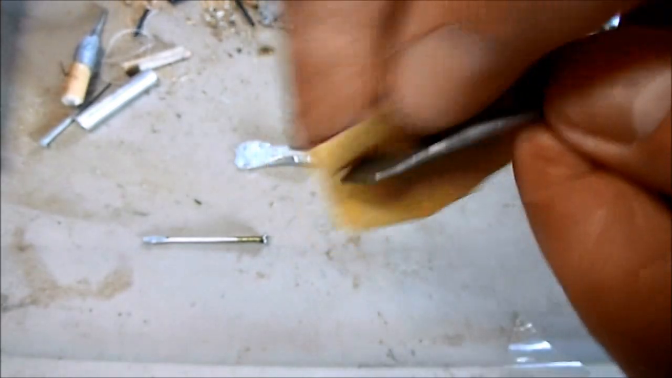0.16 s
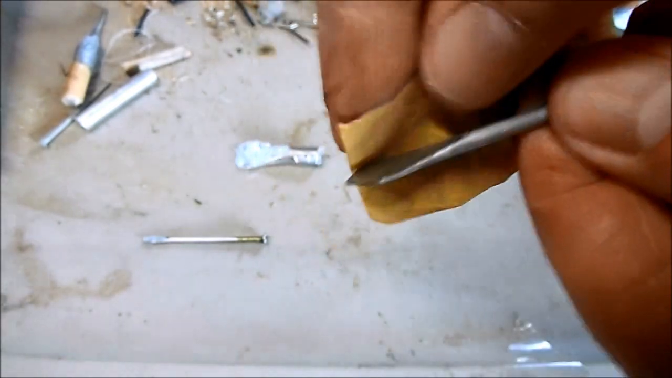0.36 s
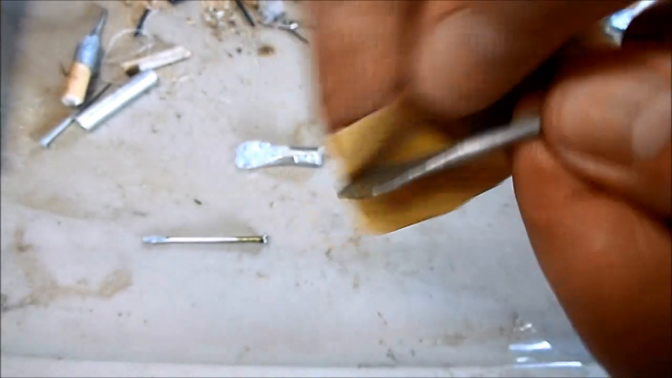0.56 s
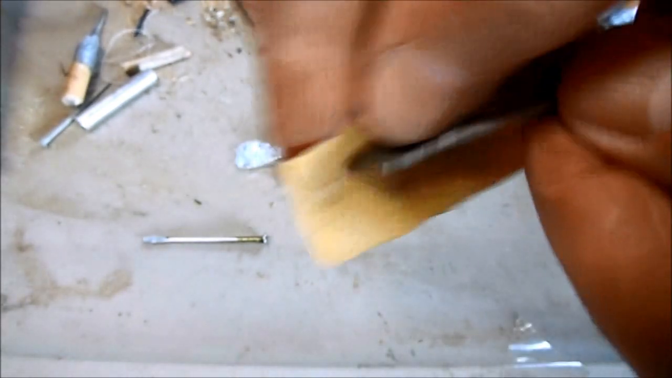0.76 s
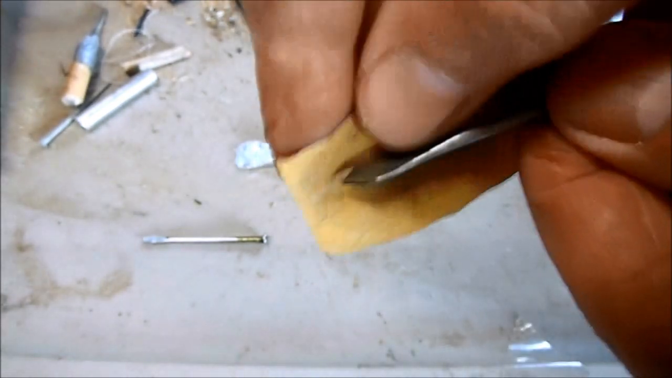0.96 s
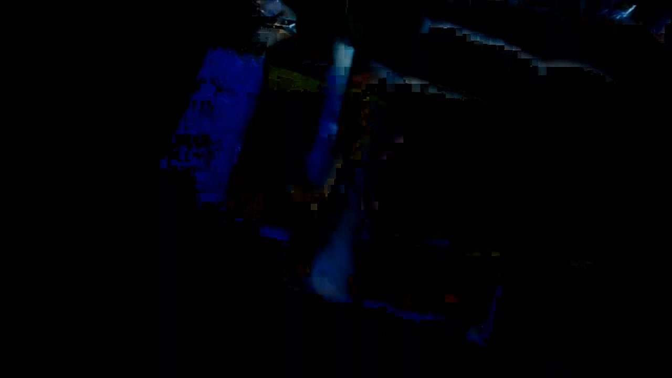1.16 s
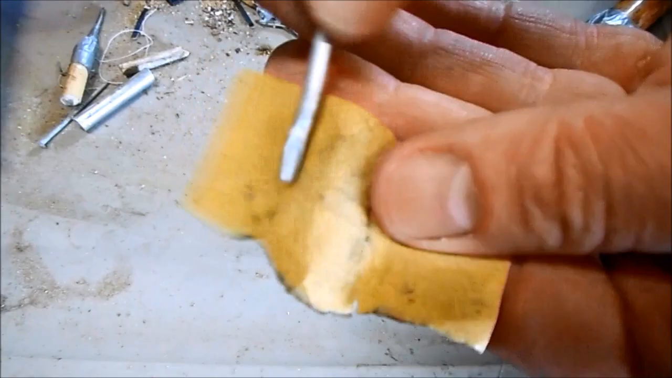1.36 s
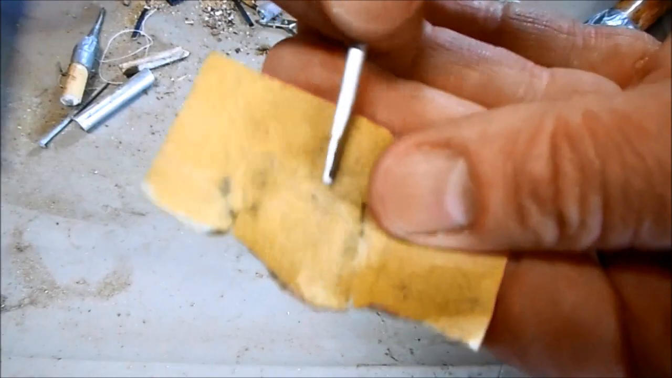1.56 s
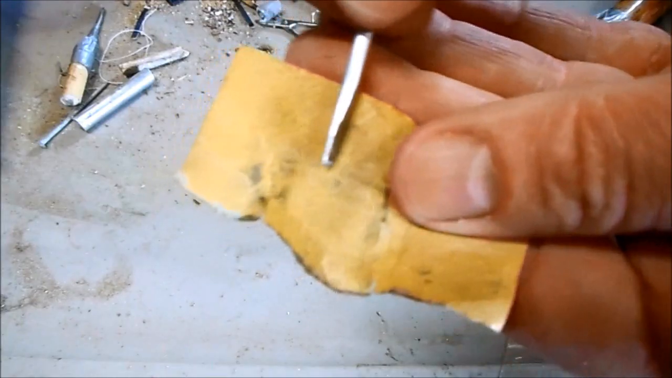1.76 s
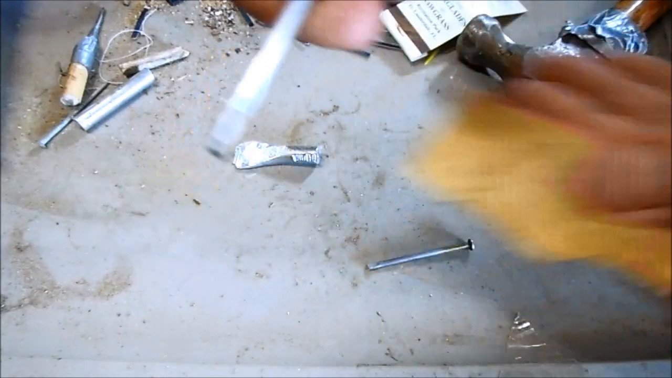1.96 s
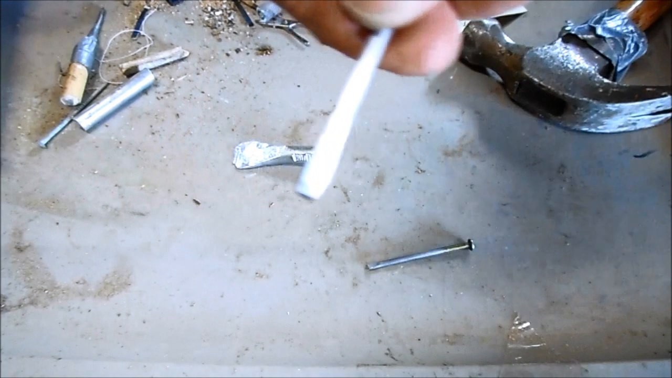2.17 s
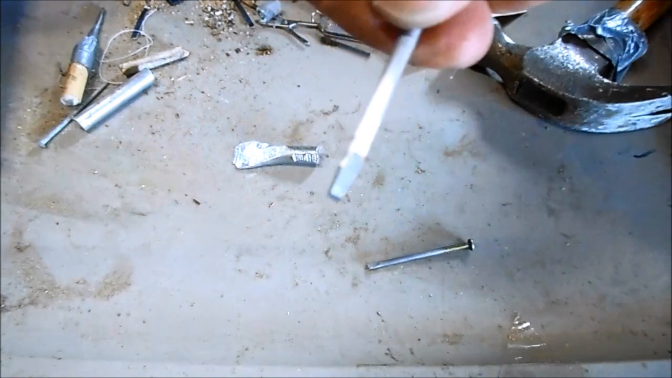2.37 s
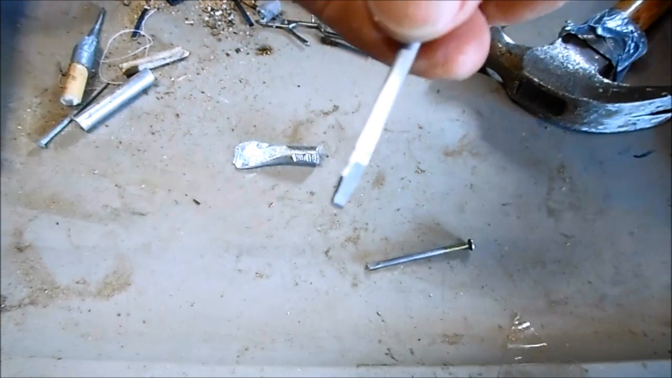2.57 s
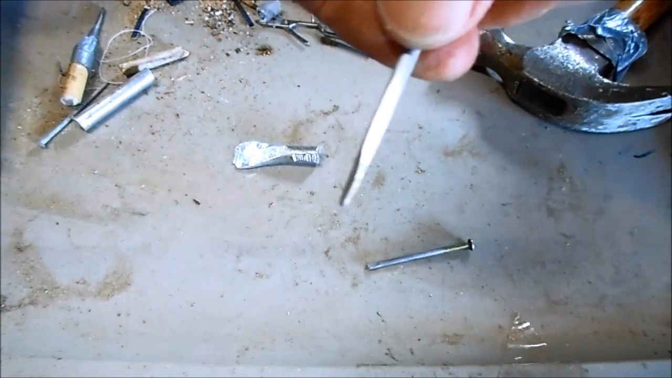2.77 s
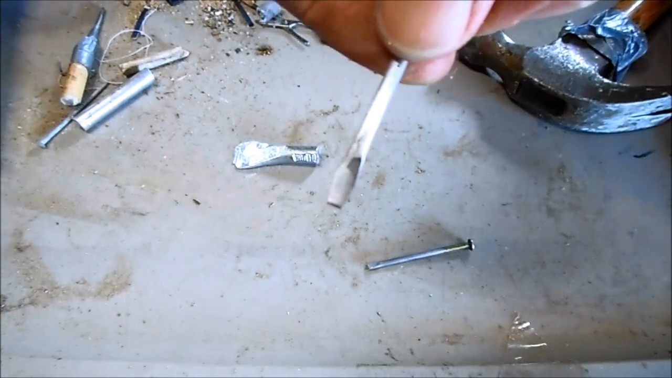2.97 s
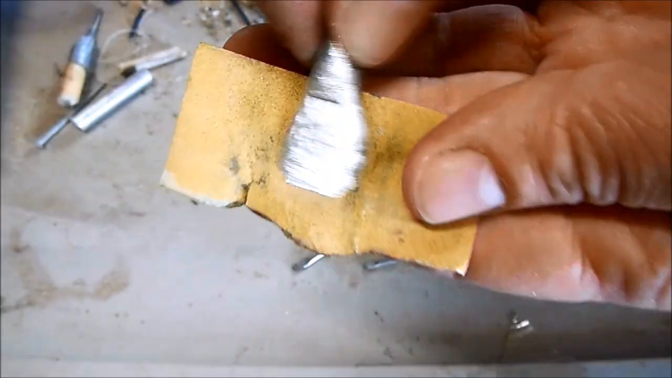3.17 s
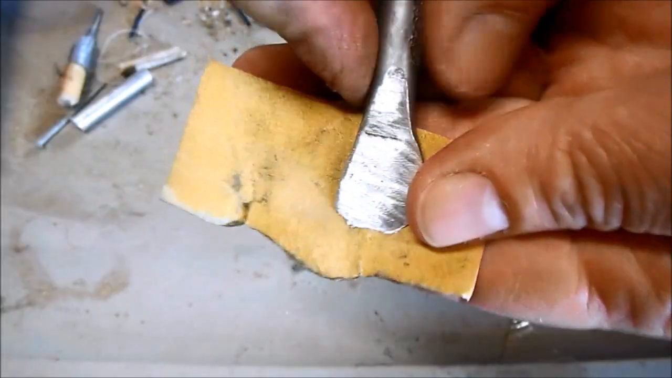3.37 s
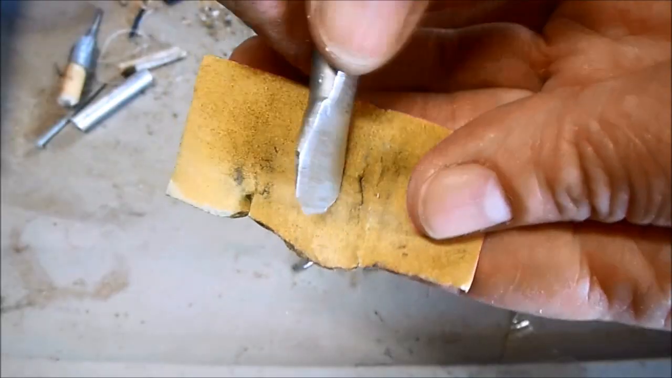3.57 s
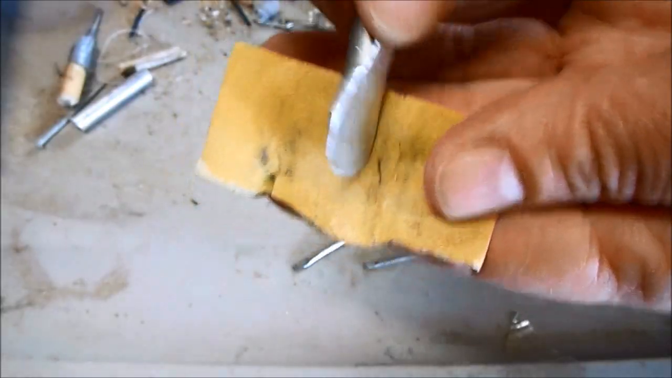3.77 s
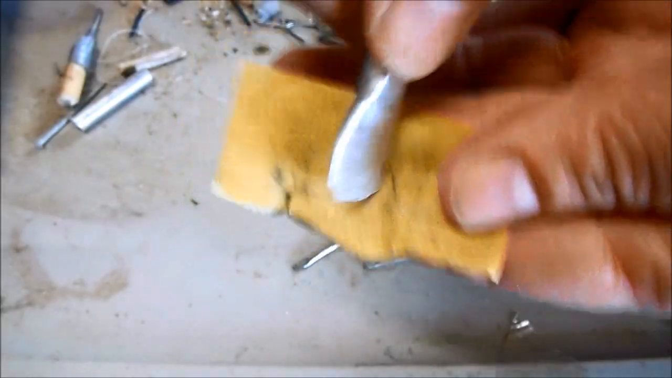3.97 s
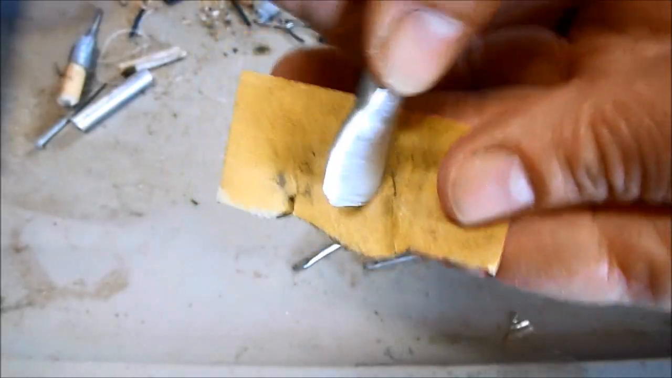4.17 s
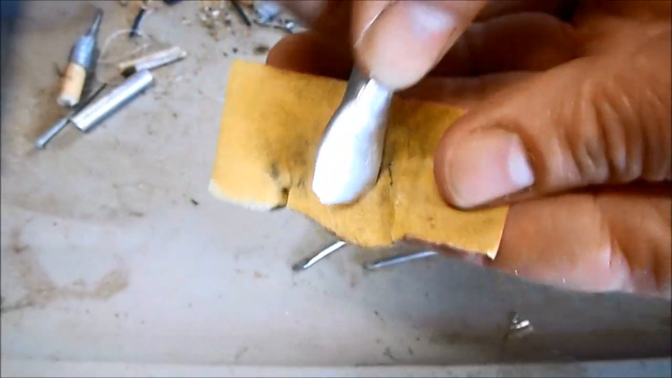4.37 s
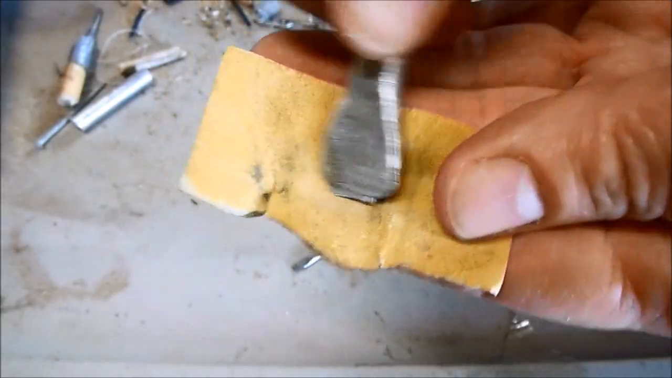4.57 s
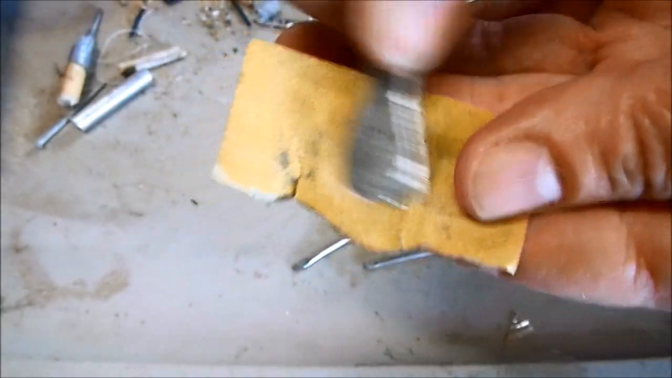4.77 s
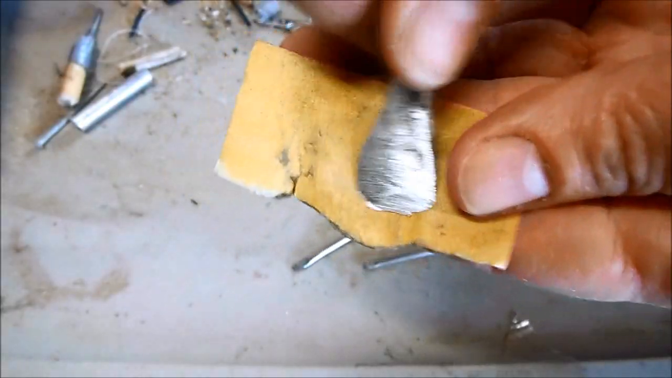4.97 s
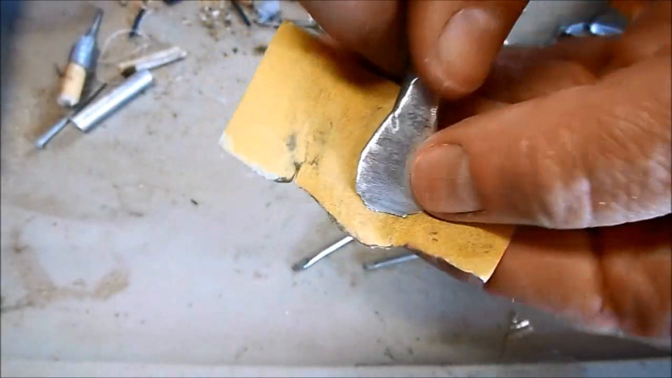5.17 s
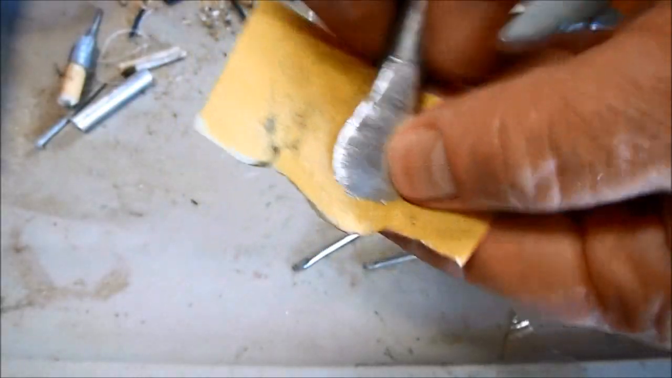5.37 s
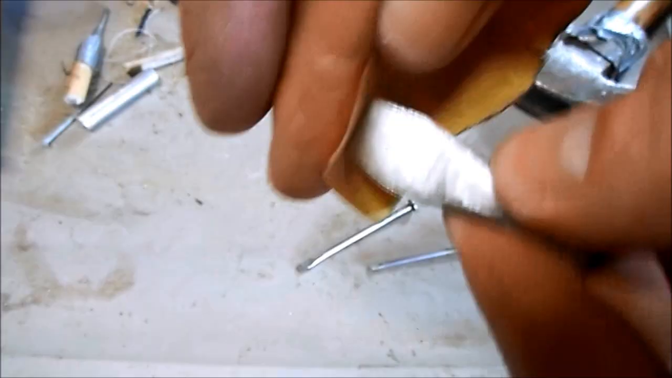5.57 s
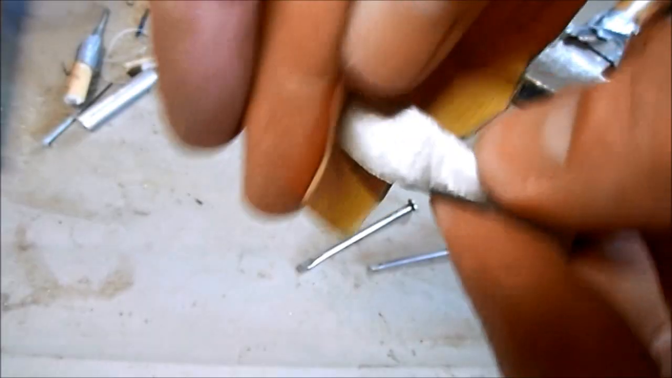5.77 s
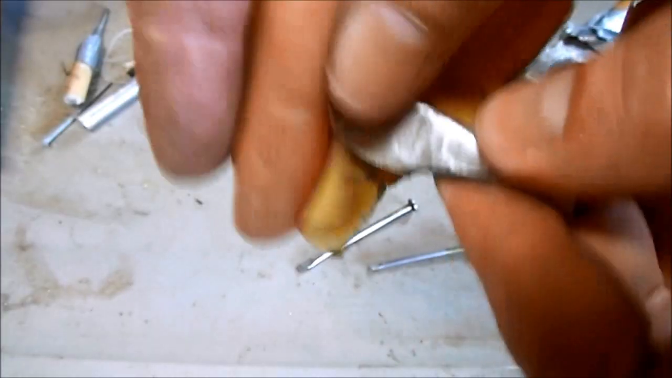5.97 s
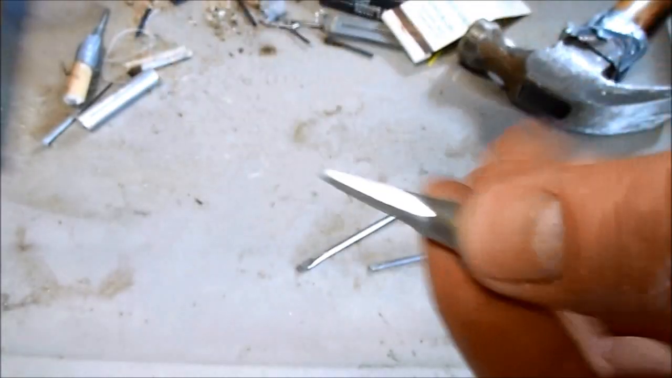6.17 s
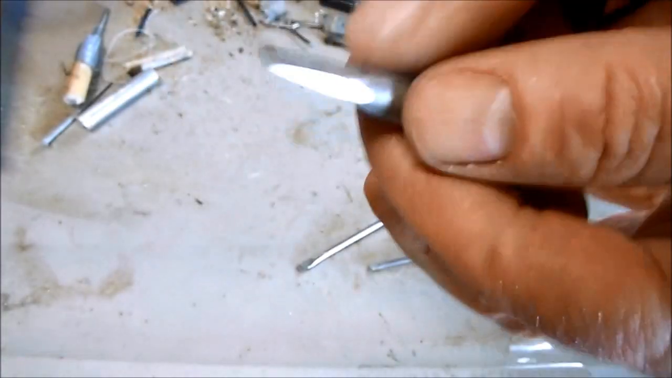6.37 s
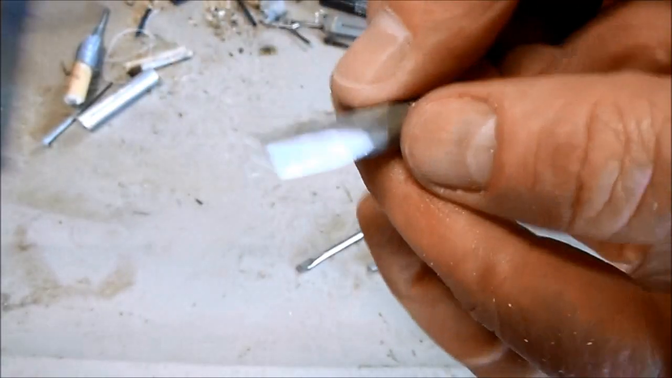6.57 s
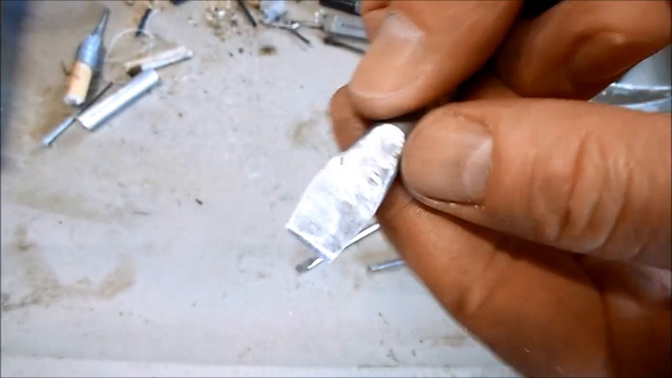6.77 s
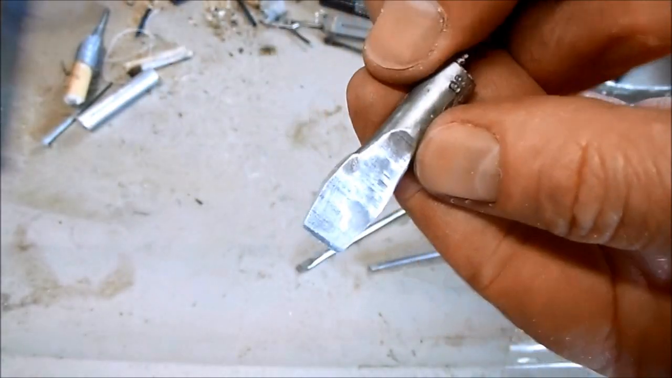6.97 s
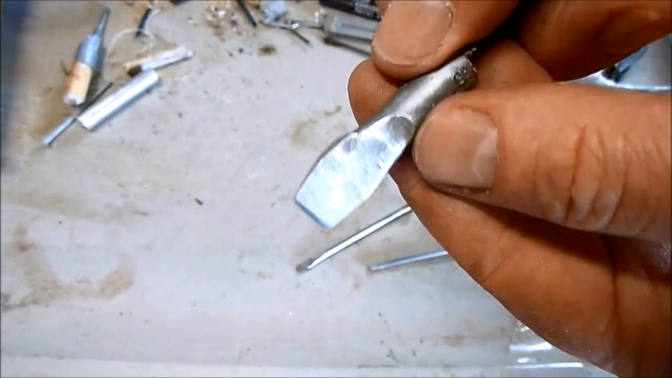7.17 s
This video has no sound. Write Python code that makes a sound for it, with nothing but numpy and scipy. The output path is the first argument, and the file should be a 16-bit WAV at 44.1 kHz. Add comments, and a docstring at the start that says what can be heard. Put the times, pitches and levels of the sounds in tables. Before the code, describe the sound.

Close and dry, at a workbench in a quiet room. From 0 to 1.25 seconds a steel blade rubs sandpaper in an even, fast back-and-forth rasp, about four full cycles a second, each push slightly stronger than the pull, over a low steady hum and soft rumble. The hum cuts off at about 1.2 seconds. Weaker, separate scratches follow until 1.9, then mostly faint room noise until 3.1. Two firm scrapes at 3.2 open a second, looser burst: after a weaker patch, single strokes come roughly every tenth of a second from 4 to 5, brightest and sharpest around 4.5 and 4.9, with crisp grit cracks. Scattered rough strokes continue from 5.5 to 6.4 as low handling rumble returns, including a hard bright scrape at 6.1. At 6.8 a light scrape and dull little bump leave a very faint steel ring, fading into rumble by 7.2.

```python
"""A low hum and a soft rumble lie under an even back-and-forth rasp, over faint room noise and sliding skin.
A steel screwdriver blade is rubbed on sandpaper held in the fingers, close to the microphone.
Looser single strokes follow as the hum stops: filtered bursts of grain noise that swell with the hand's speed.
Each bites as it starts, grit snags on the edge in short cracks, and each new grip colours the rasp.
Near the end the rumble returns and the blade bumps a finger: a dull tone with a faint steel ring."""
import sys
import numpy as np
from scipy import signal
from scipy.fft import rfft, irfft, next_fast_len
from scipy.io import wavfile
from scipy.ndimage import uniform_filter1d

SR = 44100
rng = np.random.default_rng(int(sys.argv[2]) if len(sys.argv) > 2 else 0)


def to_wav(s):
    """Save 16-bit WAV."""
    ch = np.atleast_2d(s).T  # columns
    pcm = np.round(np.clip(ch, -1, 1) * 32767)  # PCM
    wavfile.write(sys.argv[1], SR, pcm.astype(np.int16))


N = 319147  # length [samples]

# left-right likeness of the diffuse background: (frequency [Hz], likeness [0-1])
ROOM_LIKENESS = [(40, 0.93), (160, 0.96), (320, 0.67), (700, 0.65), (1500, 0.39), (3000, 0.11),
                 (6000, 0.09), (13000, 0.15)]


def from_db(db):
    """Amplitude factor of a level in dB."""
    return 10 ** (np.asarray(db) / 20)


def rms_one(x):
    """Scale to an rms of 1."""
    return x / np.sqrt(np.mean(x ** 2) + 1e-20)


def at_hz(points, hz):
    """A curve's value at the given frequencies, interpolated over log frequency."""
    f, value = np.transpose(points)
    return np.interp(np.log(np.maximum(hz, 1)), np.log(f), value)


def bell(hz, centre_hz, width_hz):
    """Shape of a resonance, 1 at its top; the width is taken at half height."""
    return 1 / (1 + (2 * (hz - centre_hz) / width_hz) ** 2)


def colour(x, gain_db, size=1024):
    """Causal (minimum-phase) filter with the shape gain_db(Hz), scaled to unit power gain."""
    gain = rms_one(from_db(gain_db(np.fft.rfftfreq(size, 1 / SR))))
    # folding the cepstrum onto positive times gives the minimum phase
    cepstrum = irfft(np.log(gain))
    cepstrum[1:size // 2] *= 2
    cepstrum[size // 2 + 1:] = 0
    impulse = irfft(np.exp(rfft(cepstrum)))
    return signal.fftconvolve(x, impulse[None], axes=1)


def noise(count, spectrum=None, likeness=None):
    """Stereo noise of rms 1, its left-right likeness set by frequency (close sounds by default)."""
    # left-right likeness of the close sounds: (frequency [Hz], likeness [0-1])
    close_likeness = [(500, 0.97), (2500, 1), (5000, 0.99), (9000, 0.81), (14000, 0.38)]
    size = next_fast_len(count)
    hz = np.fft.rfftfreq(size, 1 / SR)
    alike = np.clip(at_hz(close_likeness if likeness is None else likeness, hz), 0, 1)
    mid, side = rfft(rng.standard_normal((2, size)))
    both = np.sqrt(1 + alike) * mid + np.sqrt(1 - alike) * side * [[1], [-1]]
    if spectrum is not None:
        both = both * from_db(at_hz(spectrum, hz)) * (hz > 15)
    return rms_one(irfft(both, size)[:, :count])


def wobble(count, per_s):
    """Smooth random drift of spread 1 with per_s new values a second."""
    steps = np.arange(count) * per_s / SR
    # straight lines between the values shrink the spread; the factor restores it
    return np.interp(steps, np.arange(count), rng.standard_normal(count)) * np.sqrt(3 / 2)


def add(out, x, s):
    """Mix x in from time s [s]."""
    i = max(round(s * SR), 0)
    out[:, i:i + x.shape[1]] += x[:, :N - i]


def spells(rows, attack_s, release_s, sag_db_per_s=0):
    """Gain of a sound that comes in spells: each swells, holds or sags, and dies away."""
    t = np.arange(N) / SR
    gain = np.zeros(N)
    for start, end, db in rows:
        swell = np.clip((t - start) / attack_s, 0, 1)
        dying = np.exp(-np.maximum(t - end, 0) / release_s)
        gain += from_db(db - sag_db_per_s * (t - start)) * swell * dying
    return gain


def top_cut(x):
    """Steep low-pass at the top of the band."""
    return signal.sosfilt(signal.ellip(10, .3, 70, 14200, fs=SR, output="sos"), x)


def room():
    """Steady room noise from all around, weighted to the bass."""
    # spectrum of the room noise: (frequency [Hz], relative level [dB per Hz])
    room_spectrum = [(20, -6), (40, -3.5), (62, -6), (110, -10), (170, -15), (240, -13.5), (330, -19.5),
                     (600, -21), (1000, -20.5), (1600, -27.5), (2500, -29.5), (6000, -33.5), (14000, -39)]
    return from_db(-50.5) * noise(N, room_spectrum, ROOM_LIKENESS)


def rumble():
    """Low noise that comes with the moving hands, sagging slowly in each spell."""
    # spells of rumble: (start [s], end [s], level at the start [dB])
    rumble_spells = [(-0.2, 1.38, -49.5), (5.55, 7.24, -40)]
    # spectrum of the rumble: (frequency [Hz], relative level [dB per Hz])
    rumble_spectrum = [(20, 0.5), (40, 5.5), (75, 0.5), (140, 1), (230, -0.5), (330, -12.5), (700, -18),
                       (1500, -26), (5000, -27)]
    gain = spells(rumble_spells, attack_s=0.055, release_s=0.57, sag_db_per_s=2.5)
    return gain * noise(N, rumble_spectrum, ROOM_LIKENESS)


def fingers(resting_db=-67, rough_db=2.5, rough_per_s=220):
    """Fingertips slide on paper and steel with a faint, uneven hiss."""
    # spells of sliding: (start [s], end [s], level before the roughness [dB])
    sliding = [(-0.2, 1.25, -46.5), (1.3, 1.95, -59.5), (3.15, 4.95, -53), (5.55, 7.1, -53)]
    # spectrum of the sliding skin: (frequency [Hz], relative level [dB per Hz])
    skin = [(300, 8), (1000, 7), (1900, 1.5), (3300, -1), (4800, -3.5), (6500, -6), (11000, -5),
            (14500, -4.5)]
    gain = np.hypot(from_db(resting_db), spells(sliding, attack_s=0.064, release_s=0.12))
    return gain * from_db(rough_db * wobble(N, rough_per_s)) * noise(N, skin)


def hum(waver_db=0.5, waver_per_s=8.5, end_s=1.21, fade_s=0.016):
    """Two low tones, wavering slightly in level, that stop together."""
    # tones of the hum: (frequency [Hz], rms level before the waver [dB])
    hum_tones = [(91.5, -51), (177.6, -39.5)]
    t = np.arange(N) / SR
    tones = np.zeros(N)
    for hz, db in hum_tones:
        level = np.sqrt(2) * from_db(db + waver_db * wobble(N, waver_per_s))
        tones += level * np.sin(2 * np.pi * (hz * t + rng.random()))
    return tones * np.clip((end_s - t) / fade_s + .5, 0, 1)


def grip_at(s):
    """Treble pan [dB] and resonances of the grip in use at time s."""
    # ways of holding blade and paper:
    # (from [s], treble left-right [dB], resonances [(centre [Hz], width [Hz], lift [dB])])
    grips = [ (0, -2.5, [(3300, 900, 5), (4500, 700, -3), (6450, 800, 4), (9400, 2400, 6),
             (14000, 2500, -5)]), (1.25, -.8, [(3050, 600, 6), (4000, 800, -6), (5700, 700, 3),
             (8330, 450, 11), (11800, 1200, 3)]), (3.0, -5, [(1400, 2000, -5), (4000, 600, -3),
             (8100, 900, 4), (9900, 2200, 5)]), (3.97, -4, [(1800, 1500, -3), (4800, 500, 3),
             (6300, 700, 6), (7300, 800, 7)]), (4.47, -2.5, [(1050, 300, 4), (3900, 1400, 5),
             (11000, 3500, 3), (13900, 1100, 9)]), (5.55, -1.5, [(1900, 500, 3), (3250, 1100, 7),
             (5200, 1000, 5), (14000, 2000, -4)]), (6.08, -2.5, [(1650, 1000, 5), (5400, 1100, 7),
             (6900, 900, 3), (11300, 2000, 4)]), (6.16, -2, [(800, 1500, -10), (2300, 500, 5),
             (3900, 1400, 9)]), (6.7, 0, [(450, 300, 12), (1890, 250, 11), (2350, 300, 6),
             (4900, 1100, 10)])]
    return [grip for grip in grips if grip[0] <= s][-1][1:]


def aim(x, treble_pan_db):
    """Only the treble is directional enough to favour one side."""
    # edges of the directional treble: (low [Hz], high [Hz])
    treble_band = (6500, 13400)
    treble = signal.sosfiltfilt(signal.butter(2, treble_band, "band", fs=SR, output="sos"), x)
    return x + treble * (from_db(np.array([[1], [-1]]) * treble_pan_db / 2) - 1)


def body_db(s, hz):
    """Colour of blade and paper in the grip in use."""
    # rasp of steel on grit: (frequency [Hz], relative level [dB per Hz])
    rasp_spectrum = [(120, -10), (300, -9.5), (600, -3.5), (1100, -3.5), (1900, -3.5), (3000, 0),
                     (4200, -1), (7000, 1), (10000, 1), (14500, 0.5)]
    resonances = grip_at(s)[1]
    return at_hz(rasp_spectrum, hz) + sum(db * bell(hz, centre, width) for centre, width, db in resonances)


def ripple(hz, ripple_db, spacing_hz=260):
    """The paper's many small resonances fall differently at each contact."""
    return ripple_db * np.interp(hz / spacing_hz, np.arange(256), rng.standard_normal(256))


def grit(speed, spread_db, grains_per_s=2200, grain_s=0.0006, hiss_share=0.17, judder_db=1.5, judder_per_s=150):
    """Grains hit the steel faster as it speeds up, each a tiny dying burst; the blade judders over them."""
    count = len(speed)
    sizes = from_db(spread_db * np.clip(rng.standard_normal(count), -2.5, 2.5))
    chance = grains_per_s * (.4 + .6 * speed) / SR
    hits = (rng.random(count) < chance) * sizes ** 2
    power = signal.lfilter([1], [1, -np.exp(-1 / (grain_s * SR))], hits + 1e-12)
    # the hand's steady push is shared among the grains in contact
    power /= uniform_filter1d(power, size=900) + 1e-12
    envelope = np.sqrt(power + hiss_share) * from_db(judder_db * wobble(count, judder_per_s))
    return rms_one(envelope) * noise(count)


def all_strokes(run_start_s=0.031, cycle_s=0.247, cycles=5, single_rise=0.34):
    """The even run of pushes and pulls, then the single strokes, in the columns of single plus rise."""
    # push and weaker pull of a cycle: (time into the cycle [s], length [s], level before force and gain [dB],
    # treble lift [dB], spread of the grain sizes [dB], share spent speeding up [0-1])
    push_and_pull = [(0, 0.11, -23.5, -1.5, 4, 0.5), (0.119, 0.12, -25, 1.5, 4, 0.42)]
    # force of the hand in the run, easing off at the end: (time [s], level change [dB])
    run_force = [(0.1, -1.5), (0.6, -2.6), (0.93, 0.2), (1.06, -5.5), (1.2, -4.5)]
    # single strokes: (start [s], length [s], level before gain [dB], treble lift [dB],
    # spread of the grain sizes [dB])
    single = [(1.262, 0.094, -42, 1, 10), (1.384, 0.032, -34, -10, 8.5), (1.545, 0.036, -35.5, 12, 4),
              (1.639, 0.072, -39, -2, 8), (1.824, 0.084, -30, -3.5, 8.5), (3.163, 0.1, -25.5, -0.5, -1),
              (3.27, 0.14, -31, -0.5, 2), (3.469, 0.2, -51.5, 8, 20), (3.731, 0.085, -40, -10, 9),
              (3.856, 0.11, -40.5, -11, 12), (3.997, 0.1, -28.5, 0.5, 4.5), (4.111, 0.1, -35.5, -1, 9),
              (4.232, 0.095, -31.5, 1.5, 2.5), (4.339, 0.109, -36, -0.5, 6.5),
              (4.484, 0.034, -22, 9.5, 5.5), (4.512, 0.061, -28, 0.5, 5), (4.602, 0.12, -36, -1.5, 5),
              (4.715, 0.1, -27.5, 3, 5), (4.811, 0.099, -23, 5.5, -2.5), (4.916, 0.1, -21.5, 8, 4),
              (5.02, 0.065, -36.5, 5, 11), (5.109, 0.046, -46.5, 1, 10), (5.263, 0.07, -43.5, -10, 1),
              (5.462, 0.11, -31, 3.5, 14), (5.584, 0.078, -32, -10, 15), (5.694, 0.09, -34.5, 0.5, 3.5),
              (5.807, 0.13, -32, 1, 17), (5.934, 0.096, -27.5, 2, 5.5), (6.094, 0.058, -18.5, 5, 6),
              (6.171, 0.1, -37.5, 8, 1), (6.244, 0.083, -29, 4, 5), (6.369, 0.066, -45, -10, 20),
              (6.822, 0.12, -42.5, -4.5, 9)]
    run = []
    for cycle in range(cycles):
        for after_s, length, level_db, lift_db, spread_db, rise in push_and_pull:
            start = run_start_s + cycle * cycle_s + after_s
            force_db = np.interp(start + length / 2, *np.transpose(run_force))
            run.append((start, length, level_db + force_db, lift_db, spread_db, rise))
    return run + [(*stroke, single_rise) for stroke in single]


def strokes(gain_db=1.0, speed_power=1.29, lift_hz=8500, ripple_db=2.5):
    """The hand speeds up and slows down again in every stroke; the rasp swells with the speed."""
    out = np.zeros((2, N))
    for start, length, level_db, lift_db, spread_db, rise in all_strokes():
        progress = np.linspace(0, 1, round(length * SR))
        speed = np.abs(np.sin(np.interp(progress, [0, rise, 1], [0, np.pi / 2, np.pi])))
        middle = start + length / 2

        def response(hz):
            shelf = hz ** 4 / (hz ** 4 + lift_hz ** 4)
            return body_db(middle, hz) + lift_db * shelf + ripple(hz, ripple_db)
        rasp = colour(grit(speed, spread_db) * speed ** speed_power, response)
        add(out, from_db(level_db + gain_db) * aim(rasp, grip_at(middle)[0]), start)
    return out


def bites(after_s=0.009, bite_db=5, scatter_db=2, pitch_hz=8100, ring_db=5):
    """The edge bites just after each stroke starts: a small snag, stronger for a harder stroke."""
    return [(start + after_s, level_db + bite_db + scatter_db * rng.standard_normal(), pitch_hz, ring_db)
            for start, _, level_db, *_ in all_strokes()]


def snags(gain_db=8.5, tail_s=0.0047, tail_db=-17, ring_q=1.6, ripple_db=3.0, delay_s=0.00087):
    """A grain breaks free with a crack; the fingers damp the blade within milliseconds."""
    # the edge catches on a large grain: (time before the delay [s], strength before gain [dB],
    # ring pitch [Hz], ring lift [dB])
    large_grains = [(0.379, -13, 9700, 1), (0.697, -15, 9600, 8), (1.0779, -15, 8750, 8),
                    (1.2747, -13.5, 7600, -2), (1.355, -17, 8940, 1), (1.3643, -19, 5540, 8),
                    (1.3682, -13.5, 5730, 8), (1.4034, -12.5, 7260, 10), (3.1353, -28, 11300, 1),
                    (3.271, -19, 9700, 6), (3.3583, -12, 10400, 10), (3.496, -23.5, 8500, 12),
                    (3.8732, -7.5, 11300, 6), (4.1862, -13.5, 6150, 10), (4.4003, -17, 7440, 5),
                    (4.4431, -18.5, 6800, 10), (4.4987, -3.5, 13800, 15), (4.5044, -4.5, 14200, 9),
                    (4.5226, -5, 13900, 9.5), (4.9501, -2, 12400, 8), (4.9864, -11.5, 13000, 2),
                    (5.3968, -24.5, 1650, 20), (5.6032, -12, 3260, 8), (5.8553, -11.5, 3400, 10.5),
                    (6.3789, -21.5, 4710, 8), (6.4462, -26.5, 4910, 9), (6.4792, -25, 9630, 11),
                    (6.8304, -26, 5100, 4), (7.0723, -25, 2190, 14)]
    # one point of contact reaches both sides much alike: (frequency [Hz], likeness [0-1])
    snag_likeness = [(2500, 0.89), (14000, 0.82)]
    out, t = np.zeros((2, N)), np.arange(SR // 40) / SR
    envelope = np.exp(-t / .0005)
    envelope += from_db(tail_db) * np.exp(-t / tail_s)
    for s, strength_db, pitch_hz, ring_db in list(large_grains) + bites():
        def response(hz):
            ring = ring_db * bell(hz, pitch_hz, pitch_hz / ring_q)
            tilt = 0.1 * np.log2(hz + 1)  # dB per octave: a little brighter than the rasp
            return body_db(s, hz) + ring + tilt + ripple(hz, ripple_db)
        tick = top_cut(colour(noise(len(t), likeness=snag_likeness) * envelope, response))
        tick /= np.linalg.norm(tick.mean(axis=0))  # unit energy in the left-right mean
        add(out, from_db(strength_db + gain_db) * aim(tick, grip_at(s)[0]), s + delay_s)
    return out


def workshop(x, wet_db=-28, t60=1.0):
    """Faint reflections from the bench and the walls, as a dying noise tail."""
    t = np.arange(SR // 2) / SR
    tail = rng.standard_normal((2, len(t))) * from_db(-60 * t / t60) * (t > .002)
    tail /= np.sqrt(np.sum(tail ** 2, axis=1, keepdims=True))
    return x + from_db(wet_db) * signal.fftconvolve(x, tail, axes=1)[:, :N]


def bump(bump_s=6.832):
    """The blade bumps a finger: flesh damps the blow to a short, dull tone; the steel rings on faintly."""
    # modes of the blade: (frequency [Hz], starting peak level [dB], time to fall 60 dB [s])
    blade_modes = [(458, -31.5, 0.042), (1900, -54, 1), (2340, -58, 0.8), (4538, -54, 0.4),
                   (4800, -48, 0.23)]
    out, t = np.zeros((2, N)), np.arange(SR // 2) / SR
    for hz, peak_db, t60 in blade_modes:
        ring = from_db(peak_db - 60 * t / t60) * np.sin(2 * np.pi * hz * t)
        add(out, ring[None], bump_s)
    return out


def scene():
    """Sanding close to the microphone; skin, hum, room noise and rumble behind."""
    background = room() + rumble() + fingers() + hum()
    return background + workshop(strokes() + snags() + bump())


def record(dry):
    """The right side lags a little in the top octave; the recorder cuts the top off steeply."""
    a = signal.iirnotch(16000, 8, fs=SR)[1]
    lagging = signal.lfilter(a[::-1], a, dry[1])  # all-pass: delays without changing the level
    return top_cut(np.array([dry[0], lagging]))


dry = scene()
out = record(dry)
to_wav(out)
```